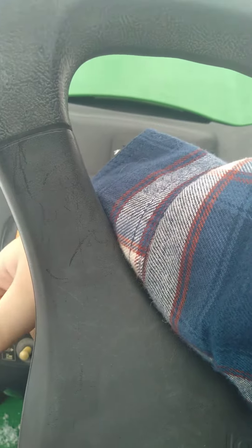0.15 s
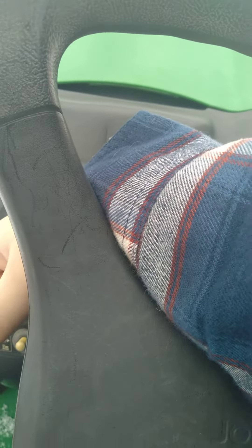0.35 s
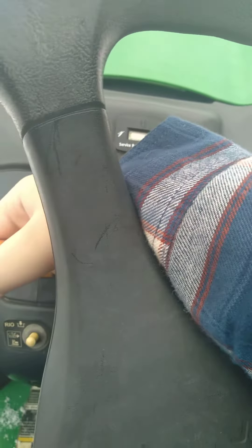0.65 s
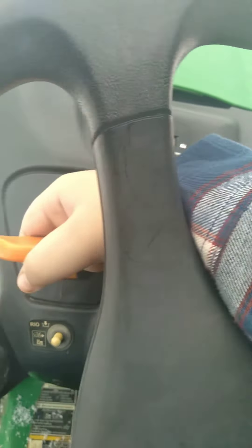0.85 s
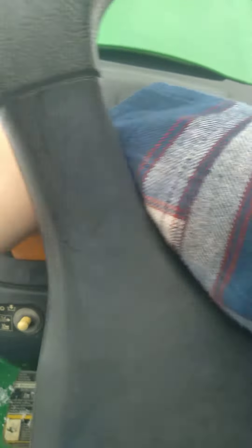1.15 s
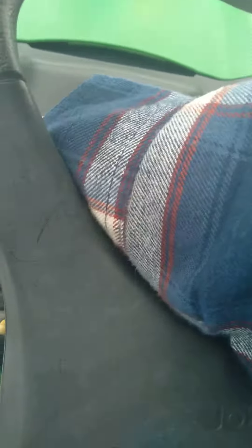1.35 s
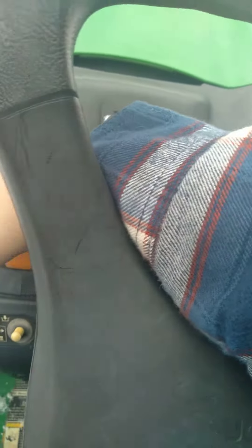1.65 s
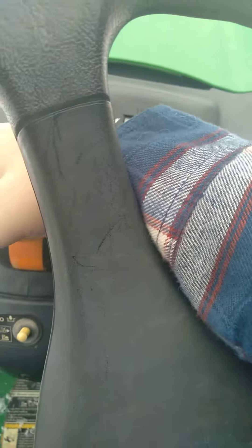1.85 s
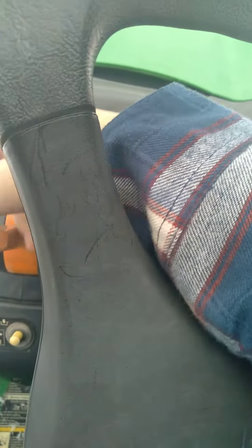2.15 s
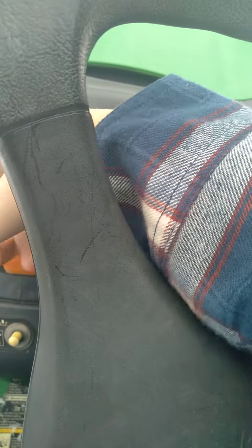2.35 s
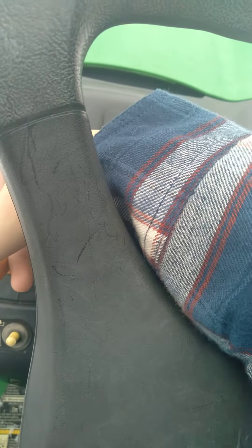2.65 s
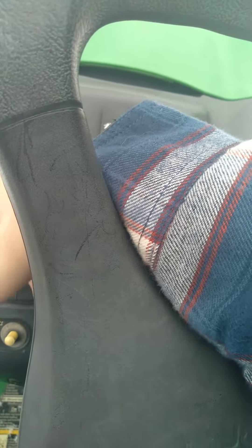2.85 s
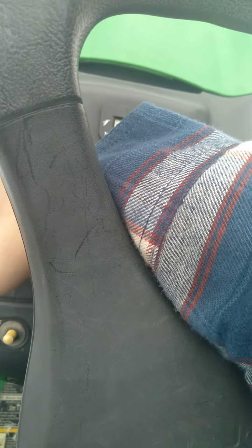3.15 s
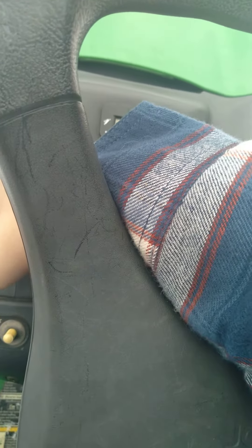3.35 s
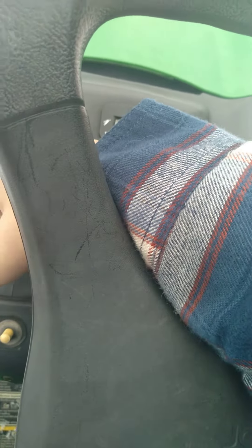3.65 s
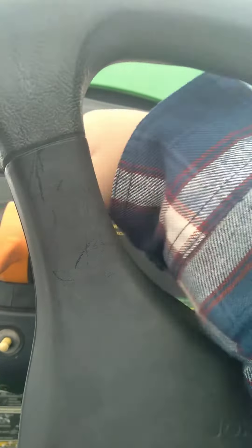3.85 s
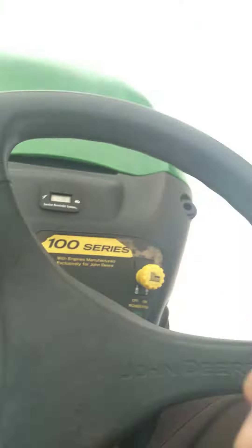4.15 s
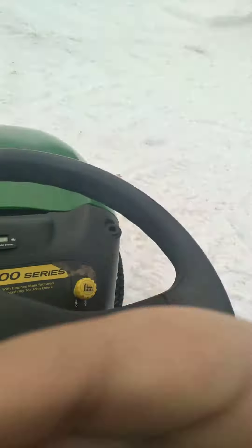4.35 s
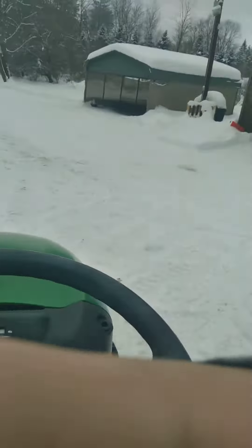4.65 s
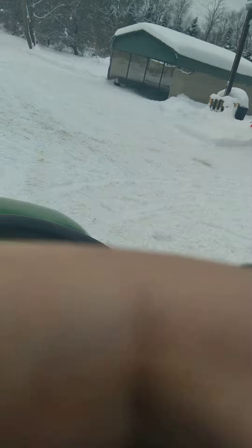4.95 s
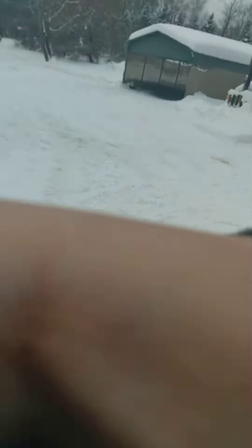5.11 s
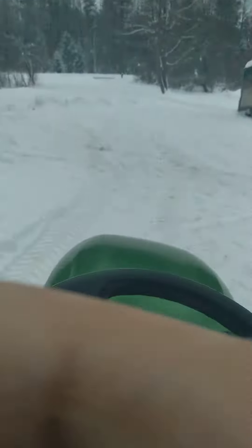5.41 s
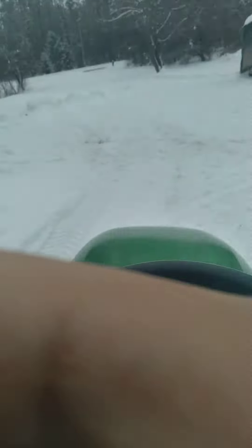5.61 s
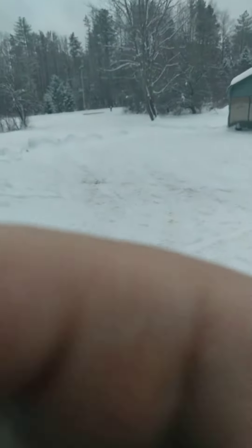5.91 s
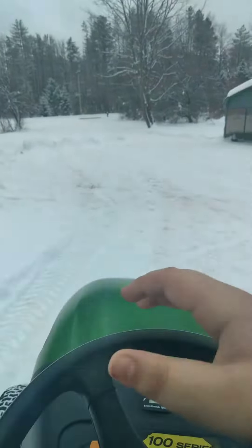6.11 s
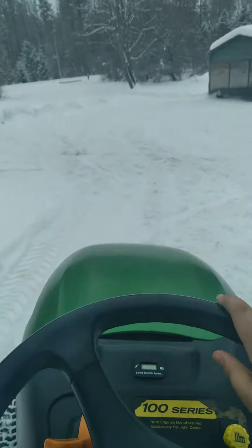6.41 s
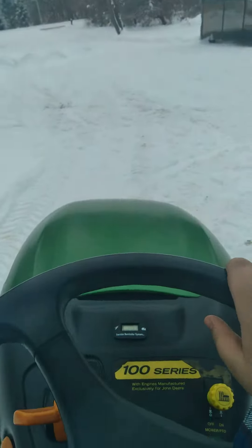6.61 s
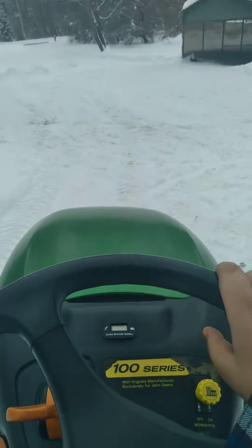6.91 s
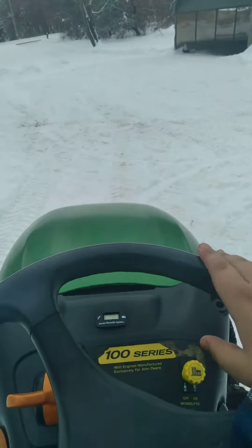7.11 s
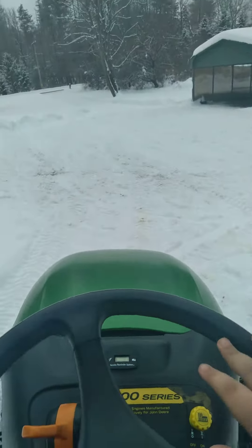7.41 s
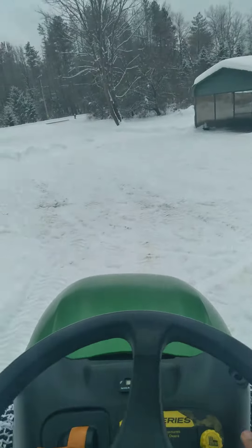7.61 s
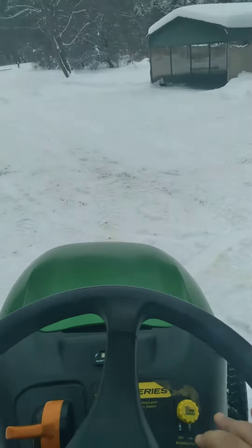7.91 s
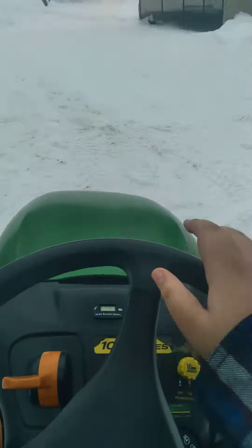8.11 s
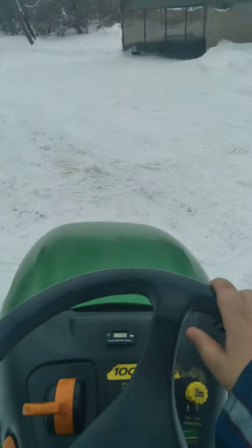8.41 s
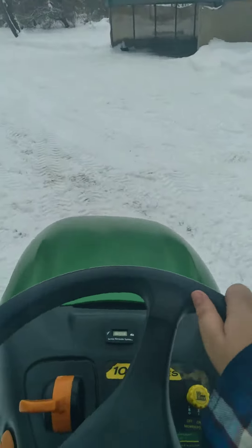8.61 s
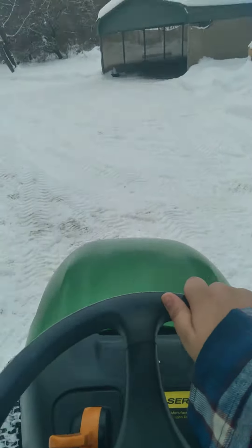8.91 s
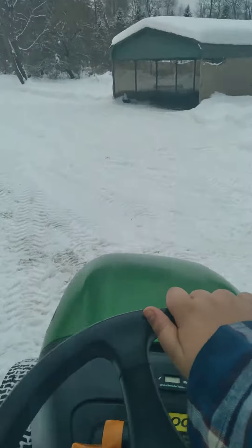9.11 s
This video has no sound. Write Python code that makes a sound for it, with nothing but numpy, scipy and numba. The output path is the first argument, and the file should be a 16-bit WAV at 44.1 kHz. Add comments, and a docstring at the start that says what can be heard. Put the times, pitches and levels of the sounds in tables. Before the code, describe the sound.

Heard from the seat, a lumpy garden tractor engine blips twice, drones on with clatter and hiss, then sags, shudders and recovers.

```python
"""A lawn tractor's V-twin heard from the seat: a ragged idle, two revs, then the drive takes up its load. Two
unevenly spaced exhaust pulses a cycle excite resonances of pipe and muffler as boom and bark. The same firings
shake the hood, knock it into a growl, and pulse the noise of clatter, hiss and sizzle; valve gear clacks after
each. Weak firings leave gulps, overruns burble, and fan roar and low rumble lie beneath."""
import sys
import numpy as np
from scipy import signal
from scipy.fft import rfft, irfft, next_fast_len
from scipy.io import wavfile
from scipy.ndimage import uniform_filter1d
from numba import njit

SR = 44100
rng = np.random.default_rng(int(sys.argv[2]) if len(sys.argv) > 2 else 0)


def generate_wav(signal):
    """Clip the signal to [-1, 1] and save it as 16-bit WAV at the path in sys.argv[1]."""
    frames = np.transpose(np.atleast_2d(signal))
    scaled = np.clip(frames, -1, 1) * 32767
    pcm = np.round(scaled).astype(np.int16)
    wavfile.write(sys.argv[1], SR, pcm)


N = 408366
TIME = np.arange(N) / SR

IDLE_RPM, CRUISE_RPM, CRUISE_EFFORT_DB = 1950, 2400, -20
SECOND_CYLINDER = 270 / 720   # crank angle of the second firing, as a share of the four-stroke cycle

# overruns, as a rev dies: (start [s], length [s], burble level [dB])
OVERRUNS = [(-.05, 0.244, -29.5), (1.374, 0.484, -26.5)]
# colour of the clatter and of the valve gear: (frequency [Hz], relative gain [dB])
CLATTER_COLOUR = [(900, -14), (1300, 0.5), (1550, 3), (1950, -0.5), (2350, 4.5), (3000, -1), (3700, -2),
                  (4400, -12), (6000, -57)]


def from_db(db):
    """Amplitude ratio of a level: 20 dB per factor of ten."""
    return 10 ** (np.asarray(db) / 20)


def in_time(rows):
    """Linear interpolation of each column of a time curve at every sample."""
    s, *columns = np.transpose(rows)
    return [np.interp(TIME, s, c) for c in columns]


def ramp(start_s, length_s):
    """Linear envelope from 0 to 1."""
    return np.clip((TIME - start_s) / length_s, 0, 1)


def swell(start_s, length_s, edge_s):
    """Trapezoidal envelope: rise, hold and fall between 0 and 1."""
    return ramp(start_s, edge_s) - ramp(start_s + length_s, edge_s)


def wandering(count):
    """Slow random modulation: straight lines through normal points of spread 1."""
    return np.interp(TIME, np.linspace(0, TIME[-1], count), rng.standard_normal(count))


def gain_at(points):
    """Spectral envelope, linear in dB over log frequency, as a gain for every FFT bin."""
    hz, db = np.transpose(points)
    bins = np.fft.rfftfreq(next_fast_len(N), 1 / SR) + 1
    return from_db(np.interp(np.log(bins), np.log(hz), db))


def coloured(x, gain):
    """Linear filtering by multiplication in the frequency domain."""
    size = next_fast_len(N)
    return irfft(rfft(x, size) * gain, size)[..., :N]


def cut(x, hz, kind, order):
    """Butterworth high- or low-pass, maximally flat in its pass band."""
    return signal.sosfilt(signal.butter(order, hz, kind, fs=SR, output="sos"), x + 1e-18)


def evened(x):
    """Level normalisation: the running power of the centre of the image is held near 1."""
    power = np.atleast_2d(x).mean(axis=0) ** 2
    for size in (SR // 5, SR // 8):
        power = uniform_filter1d(power, size)
    return x / np.sqrt(np.abs(power) + 1e-20)


def panned(x, db):
    """Interaural level difference, left minus right in dB, with the mean gain kept."""
    gains = from_db(np.array([db, -db]) / 2)
    return x * gains / gains.mean(axis=0)


@njit
def resonance(x, hz, width):
    """Damped oscillator: a two-pole resonance with a moving centre and a peak gain near 1."""
    r, y = np.exp(-np.pi * width / SR), np.zeros(len(x))
    for i in range(2, len(x)):
        drive = (1 - r * r) / 2 * (x[i] - x[i - 2])
        y[i] = drive + 2 * r * np.cos(2 * np.pi * hz[i] / SR) * y[i - 1] - r * r * y[i - 2]
    return y


def narrow(x, hz, width_hz):
    """Cascaded resonance: two passes of a fixed mode steepen its sides."""
    for _ in range(2):
        x = resonance(x, np.full(N, float(hz)), float(width_hz))
    return x


def duct(x, modes, stretch, sign, tilt_db):
    """Modal superposition: neighbours in like or opposite sign, tilted in dB per octave."""
    centre = np.mean([hz for hz, width, db in modes])
    total = 0
    for k, (hz, width, db) in enumerate(modes):
        gain = from_db(db + tilt_db * np.log2(hz / centre))
        total = total + sign ** k * gain * resonance(x, hz * stretch, float(width))
    return total


def clicks(at, sizes):
    """Impulse train: one impulse at each given sample."""
    return np.bincount(at, sizes, N)


def at_phase(phase, at, delay):
    """Crank timing: the samples a share of a cycle after the given ones."""
    return np.minimum(np.searchsorted(phase, phase[at] + delay), N - 1)


def gritty(flow, grit_db):
    """Amplitude-modulated stereo noise: the flow and millisecond grains set its strength."""
    step = SR // 1000
    grains = np.interp(np.arange(N) / step, np.arange(N // step + 2), rng.standard_normal(N // step + 2))
    return flow * from_db(grit_db * grains) * rng.standard_normal((2, N))


def diffuse_noise():
    """Partly correlated noise: a common part with a weaker independent part at each ear."""
    return rng.standard_normal(N) + 0.28 * rng.standard_normal((2, N))


def rumble(level_db=-46):
    """Broadband noise shaped by a low spectral envelope lies under everything."""
    # colour: (frequency [Hz], relative gain [dB])
    rumble_colour = [(18, -16), (30, 9), (45, 7), (70, -20), (120, -42), (280, 15), (600, -44)]
    low = cut(coloured(diffuse_noise(), gain_at(rumble_colour)), 1060, "low", order=2)
    return from_db(level_db) * evened(low)


def fan_roar(effort_db, base_db=-34, load_share=0.021):
    """Turbulence noise: the cooling fan roars in a low band and swells very slightly with effort."""
    air = cut(cut(diffuse_noise(), 286, "high", order=2), 357, "low", order=3)
    return from_db(base_db + load_share * (effort_db - CRUISE_EFFORT_DB)) * evened(air)


def ticks(ring_s=0.0084, level_db=-8):
    """Impulsive noise: short sharp ticks and snaps, with afterfire pops during the run of weak firings."""
    # (time [s], level before the common level_db [dB], low edge [Hz])
    bursts = [(.8885, -4, 5000), (.9475, -12, 5000), (1.073, 6, 4500), (2.8062, -3, 900), (3.0282, -7, 900),
              (3.2172, -3, 800), (3.8811, -9.5, 4000), (5.614, 1, 5000), (6.227, -2, 4000),
              (7.2354, -18, 900), (7.346, -8, 1300), (7.4094, -4, 3010), (7.4494, -4, 700),
              (7.6061, -3, 1300), (7.657, -4, 1300), (8.106, -11, 3000), (8.586, -8, 1200),
              (8.8511, -19, 1200), (9.1873, -12, 1200)]
    t = TIME[:SR // 20]
    out = np.zeros((2, N + len(t)))
    for s, db, low_hz in bursts:
        # each decays 60 dB in ring_s
        burst = from_db(db + level_db - 60 * t / ring_s) * rng.standard_normal((2, len(t)))
        start = int(s * SR)
        out[:, start:start + len(t)] += cut(burst, low_hz, "high", order=2)
    return cut(out[:, :N], 10000, "low", order=2)


def nearby_echoes(x, strength, wander=0.0678):
    """Comb filtering: dash, wheel and hands reflect the sound over short paths that shift."""
    out = x.copy()
    for ear in range(2):
        for path_s in rng.uniform(.0005, .004, 3):
            sway = wandering(count=16)
            out[ear] += strength * np.interp(TIME - path_s * (1 + wander * sway), TIME, x[ear])
    return out


def eddies(x, strength=0.51, path_s=0.000349, spread_s=.00009):
    """Comb filtering by a very short, restless second path: eddies colour each puff differently."""
    out = x.copy()
    for ear in range(2):
        delay_s = path_s + spread_s * wandering(count=800)
        out[ear] += strength * np.interp(TIME - delay_s, TIME, x[ear])
    return out


def band_swells(x, edge_s=0.14):
    """Time-varying band gain: bands of the bay noise swell or fade for a while, some gliding in pitch."""
    # (start [s], length to the start of the return [s], first centre [Hz], last centre [Hz],
    #  width [Hz], band gain [dB])
    passing_gains = [(0.19, 2.7, 3040, 3500, 690, -5.5), (1.52, 0.61, 2000, 4200, 3600, 4),
                     (2.75, 1.22, 2500, 2300, 700, 3), (3.96, 0.43, 7300, 8100, 700, 6.5),
                     (5.4, 0.86, 1000, 1150, 230, -5.5), (4.6, 1.6, 2160, 2230, 690, -4),
                     (4.42, 1.88, 8200, 7100, 510, 5), (4.9, 1.82, 10000, 9600, 530, 6),
                     (5.48, 1.28, 5000, 4800, 950, -4.5), (6.5, 0.5, 910, 1160, 150, 6.5),
                     (6.28, 1.8, 3100, 3370, 950, 4.5), (6.97, 1.1, 6900, 6100, 900, 3),
                     (7.56, 1.62, 4900, 4300, 1200, -8), (8.25, 1.1, 1170, 1280, 160, -12),
                     (7.9, 0.96, 1760, 1530, 210, 3.5), (7.91, .7, 10100, 10800, 1020, 6.5),
                     (5.1, 1.55, 1900, 3300, 1500, -2), (8.55, .8, 7500, 11000, 12000, -4.5)]
    for s, length_s, from_hz, to_hz, width_hz, db in passing_gains:
        hz = from_hz + (to_hz - from_hz) * ramp(s, length_s + edge_s)
        band = np.array([resonance(ear, hz, float(width_hz)) for ear in x])
        x = x + (from_db(db * swell(s, length_s, edge_s)) - 1) * band
    return x


def jet(flow, colour, level_db, pan_db, grit_db):
    """Flow-modulated noise: pulsing noise from the engine bay with its near reflections."""
    noise = nearby_echoes(coloured(gritty(flow, grit_db), colour), strength=.5)
    return from_db(level_db) * evened(panned(noise, pan_db))


def whistle(flow, width_hz=210):
    """Resonant filtering of flow noise: a narrow whistling band wanders within the sizzle."""
    # (time [s], band centre before the random wander [Hz])
    whistle_centres = [(0, 10500), (.6, 10500), (1.1, 9300), (3, 9350), (5.5, 10050), (6.3, 9660),
                       (7.5, 9950), (8.6, 9540), (9.26, 10400)]
    wander_hz = 148
    hz = in_time(whistle_centres)[0] + wander_hz * wandering(count=40)
    ears = []
    for ear in gritty(flow, grit_db=-3.0):
        band = resonance(ear, hz, float(width_hz))
        ears.append(resonance(band, hz, 4.6 * width_hz))
    return np.array(ears)


def valve_clacks(phase, at, ring_s=0.02, scatter_db=4.5):
    """Impact excitation: valve gear clacks after every firing and rings the crowded modes of the block."""
    delay_cycles = .078
    t = TIME[:SR // 20]
    ringing = rng.standard_normal((2, len(t))) * from_db(-60 * t / ring_s)
    sizes = from_db(scatter_db * rng.standard_normal(len(at)))
    blows = clicks(at_phase(phase, at, delay_cycles), sizes)
    clacks = signal.fftconvolve(blows[None], ringing, axes=1)[:, :N]
    return coloured(clacks, gain_at(CLATTER_COLOUR))


def hood(at, strength_db, flow, ring_s=0.15, lag_s=.004, buzz_db=3.0, panel_db=-7):
    """Forced panel vibration: firings ring crowded modes, differing by ear, and a strong one; edges buzz."""
    # colour: (frequency [Hz], relative gain [dB])
    hood_colour = [(400, -10.5), (540, 4.5), (650, -0.5), (730, -1.5), (810, -4.5), (930, -4.5),
                   (1050, -5.5), (1200, -10), (1500, -9.5), (2000, -22), (2400, -17), (3000, -52)]
    panel_hz, panel_width_hz = 813, 71   # the strongest mode; width of each of its two passes
    t = TIME[:SR // 10]
    panels = rng.standard_normal((2, len(t))) * from_db(-60 * t / ring_s)
    shake = np.interp(TIME - lag_s, TIME, clicks(at, from_db(strength_db / 2)))
    ringing = evened(signal.fftconvolve(shake[None], panels, axes=1)[:, :N])
    buzz = from_db(buzz_db) * evened(gritty(flow, grit_db=4.0))
    crowd = evened(coloured(ringing + buzz, gain_at(hood_colour)))
    return crowd + from_db(panel_db) * evened(narrow(shake, panel_hz, panel_width_hz))


def engine_bay(phase, at, strength_db, flow, knocks, rpm, effort_db, throttle_db, seated, clatter_pan_db,
               hiss_pan_db):
    """Source summation: hood, clatter, clacks, hiss, sizzle and whistle follow effort, speed and throttle."""
    # colours: (frequency [Hz], relative gain [dB])
    hiss_colour = [(3000, -2), (4400, -2), (5200, 2), (6500, 3.5), (7600, 6), (8600, -5), (10000, -38),
                   (12000, -39)]
    sizzle_colour = [(6500, -37), (8200, -4), (9300, -1), (10100, -2.5), (11200, -6), (13000, -11.5),
                     (14500, -10), (16000, -20.5)]
    # colour of the hiss between the ears: (frequency [Hz], left minus right [dB])
    hiss_sides = [(4000, 2), (6000, 4), (7500, 7), (9000, -1), (10300, -10), (12000, -2), (16000, 3.5)]
    extra_rpm = rpm - CRUISE_RPM
    # having sat back, a hand shields the listening point, then is slowly taken off
    covered = seated - ramp(6.83, 3.4)
    # the drive takes up the load and shakes the hood until the speed has sagged
    drive_s, rise_s, hold_s, fall_s = 6.56, 0.37, 0.079, 0.26
    straining = ramp(drive_s, rise_s) - ramp(drive_s + rise_s + hold_s, fall_s)

    # 0.33 dB per dB of effort; 0.041 dB per rpm, only this far from cruising speed
    hood_db = -30 + 0.33 * (effort_db - CRUISE_EFFORT_DB) + 0.041 * np.clip(extra_rpm, -200, 180)
    hood_db = hood_db - 4 * seated - 7 * covered + 13.5 * straining
    # the left ear is the more open one: clatter and hiss gain level as they pan to it
    waver_db = 2.5
    clatter_db = -42 + 0.4 * throttle_db + 0.014 * extra_rpm + 0.43 * clatter_pan_db
    clatter_db = clatter_db - 3.5 * covered + waver_db * wandering(count=70)
    hiss_db = -43 + 0.86 * throttle_db + hiss_pan_db - hiss_pan_db.mean()
    hiss_db = hiss_db + waver_db * wandering(count=70)
    sizzle_db = -41 + throttle_db

    rattle = from_db(hood_db) * evened(hood(at, strength_db, knocks) * from_db([[1.5], [-1.5]]))
    clatter = jet(knocks, gain_at(CLATTER_COLOUR), clatter_db, clatter_pan_db, grit_db=1.2)
    clacks = from_db(clatter_db - 7.5) * evened(panned(valve_clacks(phase, at), clatter_pan_db))
    sides = np.sqrt(gain_at(hiss_sides))
    ears = np.array([sides, 1 / sides]) / np.hypot(sides, 1 / sides)
    hiss = jet(flow, gain_at(hiss_colour) * ears, hiss_db, hiss_pan_db, grit_db=1.7)
    sizzle = jet(flow, gain_at(sizzle_colour) * ears, sizzle_db, hiss_pan_db, grit_db=1.2)
    whistling = from_db(sizzle_db - 11.0) * evened(panned(whistle(flow), hiss_pan_db - 7))
    breath = from_db(-0.72) * eddies(hiss + sizzle)
    return cut(band_swells(rattle + clatter + clacks + breath + whistling), 155, "high", order=2)


def throttle():
    """Valve opening as a control level: the rise of the intake hiss above a shut throttle, in dB."""
    # (start [s], opening time [s], held [s], closing time [s], rise [dB]); the largest rise counts
    openings = [(0.854, 0.11, 0.11, 0.82, 19), (1.8, 0.1, 0.15, 2.73, 15.5), (3.8, 0.2, 0, 2.1, 8),
                (4.9, 1.24, 0.067, 5.6, 12), (6.8, 0.35, 0.41, 1.24, 19)]
    rises = []
    for s, opening_s, held_s, closing_s, db in openings:
        rises.append(db * (ramp(s, opening_s) - ramp(s + opening_s + held_s, closing_s)))
    return np.max(rises, axis=0)


def roughness(rpm, edge_s=0.047):
    """Cyclic variability: firing scatter (dB) grows at idle; it and turbulence (dB) grow on the overrun."""
    slow = np.clip((CRUISE_RPM - rpm) / (CRUISE_RPM - IDLE_RPM), 0, 1)
    overrun = sum(swell(s, length_s, edge_s) for s, length_s, db in OVERRUNS)
    scatter_db = 0.6 + 4 * slow + 3 * overrun
    turbulence_db = -14 + 8.5 * overrun
    return scatter_db, turbulence_db


def firings(phase, scatter_db, second_db):
    """Uneven pulse timing: sample and strength (dB) of each exhaust opening, and gulps of weak ones."""
    # runs of weak firings, one cylinder failing every other cycle:
    # (time [s], count, change of strength [dB], relative gulp level [dB])
    misfires = [(.125, 6, -7, -30), (1.43, 1, -2, -20), (1.495, 4, -5, -21.5), (2.62, 1, -8, -36),
                (2.71, 7, -5.5, -22), (3.36, 2, -7, -29), (3.655, 2, -6, -24), (4.68, 1, -12, -34),
                (6.77, 2, -6, -33), (7.71, 1, -10, -40), (8.87, 1, -7, -38), (9.11, 1, -11, -21)]
    turns = (np.arange(int(phase[-1]) + 1)[:, None] + [0, SECOND_CYLINDER]).ravel()
    turns = turns[(turns > phase[0]) & (turns < phase[-1])]
    at = np.searchsorted(phase, turns)
    strength_db = scatter_db[at] * rng.standard_normal(len(at)) + second_db * (turns % 1 > 0)
    gulps = np.zeros(N)
    for s, count, loss_db, gulp_db in misfires:
        weak = np.abs(TIME[at] - s).argmin() + 4 * np.arange(count)   # four openings make two cycles
        strength_db[weak] += loss_db
        gulps[at[weak]] = from_db(gulp_db)
    return at, strength_db, gulps


def gas_flow(phase, at, strength_db, scatter_db, steady_db, choke_share, second_db=1.5):
    """Pulsating flow: puffs add in power to the fan's steady draught; the returning pipe wave chokes it."""
    # gas flow after an exhaust valve opens: (delay [cycles], width [cycles], relative level [dB])
    puffs = [(.103, .024, 1), (.18, .011, -1.5), (.285, .065, -4.5)]
    # choking by the returning wave: (delay [cycles], width [cycles], depth before choke_share [dB])
    chokes = [(.052, .022, -5), (.15, .013, -10), (.208, .013, -9)]
    grid = np.arange(0, phase[-1] + 1, 1 / 512)   # cycles

    def bells(delay, width, sizes):
        """Convolution of the firing train with one bell-shaped swell."""
        starts = np.bincount(np.searchsorted(grid, phase[at] + delay), sizes, len(grid))
        bell = np.exp(-(np.arange(-128, 129) / 512 / width) ** 2)
        return np.interp(phase, grid, np.convolve(starts, bell, "same"))

    second = phase[at] % 1 > SECOND_CYLINDER / 2
    puff_db = strength_db / 2 + second_db * second
    power = from_db(steady_db) ** 2
    for delay, width, db in puffs:
        sizes_db = db + puff_db + scatter_db * rng.standard_normal(len(at))
        power = power + bells(delay, width, from_db(sizes_db) ** 2)
    choke_db = sum(bells(delay, width, db * np.minimum(from_db(strength_db), 1))
                   for delay, width, db in chokes)
    return np.sqrt(power) * from_db(choke_share * choke_db)


def intake_honk(pulses, throttle_db):
    """Cavity resonance: the air box honks along with the strokes, louder with the throttle open."""
    # (frequency [Hz], width of each of two passes [Hz], relative level [dB])
    airbox_modes = [(278, 31, 4), (542, 70, 1)]
    box = sum(from_db(db) * narrow(pulses, hz, width) for hz, width, db in airbox_modes)
    return from_db(-52 + .95 * throttle_db) * evened(box)


def burble(flow, edge_s=0.019):
    """Noise-excited shell modes: on the overrun, late-burning gas churns in the muffler."""
    # (frequency [Hz], width of each of two passes [Hz], relative level [dB])
    shell_modes = [(340, 67, 7), (522, 79, -3), (615, 120, 2.5), (827, 370, -15.5)]
    level = sum(from_db(db) * swell(s, length_s, edge_s) for s, length_s, db in OVERRUNS)
    churn = flow * rng.standard_normal(N)
    return level * evened(sum(from_db(db) * narrow(churn, hz, width) for hz, width, db in shell_modes))


def growl(phase, at, strength_db, flow, rpm, rasp_db=-3, second_db=7.5, lead_s=0.002995, speed_power=0.31):
    """Structural resonance: firings knock on the hood, whose modes rise with the speed."""
    # hood modes at cruising speed: (frequency [Hz], width [Hz], relative level [dB])
    hood_modes = [(763, 105, -1), (816, 83, 1.5), (872, 140, -5.5)]
    # (time [s], level [dB])
    growl_levels = [(0, -68), (.8, -43), (1.1, -28), (1.5, -49), (2.3, -28), (3, -42), (4, -51), (4.6, -60),
                    (7.6, -53), (8.1, -35.5), (9.26, -35.5)]
    second = phase[at] % 1 > SECOND_CYLINDER / 2
    knock = np.interp(TIME + lead_s, TIME, clicks(at, from_db(strength_db / 2 + second_db * second)))
    rasp = from_db(rasp_db) * evened(flow * rng.standard_normal(N))
    hood_ring = duct(evened(knock) + rasp, hood_modes, (rpm / CRUISE_RPM) ** speed_power, -1.13, 0)
    hood_ring = cut(cut(hood_ring, 580, "high", order=3), 1080, "low", order=2)
    return from_db(in_time(growl_levels)[0]) * evened(hood_ring)


def panel_drone(pulses):
    """Selective resonance: two panels pick out their own pitches from the exhaust pulses."""
    # (time [s], upper panel level [dB], lower panel level [dB])
    drone_levels = [(0, -37, -43), (.6, -56, -41), (1.3, -37, -62), (4.1, -32.5, -53), (5.5, -40.5, -56),
                    (6.6, -48.5, -40), (8, -64, -37), (9.26, -55, -33.5)]
    upper, lower = from_db(in_time(drone_levels))
    return upper * evened(narrow(pulses, 629, 47)) + lower * evened(narrow(pulses, 325.4, 22))


def exhaust(phase, at, strength_db, gulps, flow, rpm, effort_db, throttle_db, turbulence_db):
    """Blowdown pulses ring pipe and chambers; pumping keeps some boom even when a firing fails."""
    # long modes of pipe and muffler at cruising speed: (frequency [Hz], width [Hz], relative level [dB])
    pipe_modes = [(101.3, 32.8, 1), (192.2, 39.1, 4.5), (213.6, 36.6, 0)]
    # muffler chambers at the heat of cruising speed: (frequency [Hz], width [Hz], relative level [dB])
    chamber_modes = [(312.3, 16.3, -9), (371.6, 36.3, -1), (437.6, 75.2, 3.5), (464.1, 52.2, 3.5)]
    swirl = from_db(turbulence_db) * evened(flow * rng.standard_normal(N))

    # the boom holds nearly steady until the effort passes the knee
    boom_knee_db, boom_slope, boom_share = -18.5, 1.36, 0.52
    boom_db = -21.5 + boom_slope * np.logaddexp(0, effort_db - boom_knee_db)
    push = np.interp(TIME + .001, TIME, clicks(at, from_db(boom_share * strength_db)))
    push = evened(push) + .7 * swirl
    # away from cruising speed the firings feed the lowest mode less
    pipe_tilt_db = 3 * np.abs(rpm - CRUISE_RPM) / (CRUISE_RPM - IDLE_RPM)
    boom = duct(push, pipe_modes, (rpm / CRUISE_RPM) ** 0.12, -1.057, pipe_tilt_db)
    boom = cut(cut(boom, 82.0, "high", order=3), 246, "low", order=3)

    # each intake stroke sends a weaker, inverted pulse
    suction_delay_cycles, suction_db = .328, -17
    suction = clicks(at_phase(phase, at, suction_delay_cycles), np.full(len(at), from_db(suction_db)))
    # the crack of the opening valve comes before the bulk of the gas
    bark_lead_s = 0.00635
    front = np.roll(clicks(at, from_db(strength_db)) - suction, -int(bark_lead_s * SR))
    crack = evened(front) + swirl

    # muffler heat as an equivalent speed: it cools slowly, never below a floor that effort raises
    cooling_rpm_per_s, warm_rpm, heat_rpm_per_db, heat_knee_db = 182, 2353, 70, -19.5
    cooling = cooling_rpm_per_s * TIME
    hot_rpm = np.maximum.accumulate(rpm + cooling) - cooling
    hot_rpm = np.maximum(hot_rpm, warm_rpm + heat_rpm_per_db * np.maximum(effort_db - heat_knee_db, 0))
    # in hotter gas the chamber modes rise and the upper ones take over
    heat_tilt_db = 11 * np.clip((hot_rpm - 2350) / 300, 0, 1.5)
    bark = duct(crack, chamber_modes, (hot_rpm / CRUISE_RPM) ** 0.56, -1.043, heat_tilt_db)
    bark = cut(cut(bark, 155, "high", order=2), 680, "low", order=3)

    # an unburnt charge sucks gas back up the pipe
    gulp_hz, gulp_width_hz = 62.0, 34.0
    gulp = resonance(gulps, np.full(N, gulp_hz), gulp_width_hz) * SR / (np.pi * gulp_width_hz)
    gulp = from_db(12.0) * cut(cut(gulp, 160, "low", order=2), 104, "high", order=3)
    low = from_db(boom_db) * evened(boom) - gulp
    high = from_db(effort_db) * evened(bark) + panel_drone(crack) + intake_honk(crack, throttle_db)
    return low, high


def scene():
    """Common excitation: the crank times the engine; effort and throttle set levels, the listener's pose sides."""
    # crankshaft: (time [s], speed [rpm])
    crank_speed = [(0.0, 2129), (0.39, 1964), (0.81, 1922), (1.08, 2430), (1.32, 2616), (1.5, 2442),
                   (1.83, 2247), (2.07, 2675), (2.36, 2824), (3.04, 2559), (3.55, 2441), (3.86, 2445),
                   (4.91, 2357), (5.05, 2369), (5.83, 2321), (6.5, 2411), (6.74, 2325), (7.09, 2033),
                   (7.46, 2302), (8.31, 2503), (8.61, 2549), (9.26, 2470)]
    # effort of the engine, as the level of its bark: (time [s], level [dB])
    engine_effort = [(0, -35), (.8, -31.5), (.96, -17), (1.31, -14.5), (1.42, -23), (1.8, -23),
                     (1.92, -16.5), (2.15, -12.5), (2.9, -15.5), (5.7, -25), (6.3, -21), (6.7, -18),
                     (7.0, -26.5), (7.43, -18.5), (7.7, -22.5), (8.22, -18.5), (8.43, -24.5), (9.26, -25.5)]
    # left minus right as the listener turns: (time [s], bark [dB], clatter [dB], hiss [dB])
    facing = [(0.0, 4, 2, -6), (3.9, 0, -6, -5), (4.5, -4.5, -10, -12), (4.9, -5, 7, -1),
              (6.0, -5.5, 16, -2.5), (7.1, -2.5, 10, -7.5), (8.6, -5, 13, -8), (9.26, -3, 12, -3)]
    rpm, = in_time(crank_speed)
    effort_db, = in_time(engine_effort)
    bark_pan_db, clatter_pan_db, hiss_pan_db = in_time(facing)
    throttle_db = throttle()
    seated = ramp(4.05, 0.43)   # the listener leans over the dash, then sits back, away from the hood

    phase = .25 + np.cumsum(rpm / 120) / SR   # cycles: two turns of the crank each
    scatter_db, turbulence_db = roughness(rpm)
    at, strength_db, gulps = firings(phase, scatter_db, second_db=0.6)
    flow = gas_flow(phase, at, strength_db, scatter_db=2.5, steady_db=-5.5, choke_share=2.7)
    knocks = gas_flow(phase, at, strength_db, scatter_db=2.5, steady_db=-7, choke_share=1.9)

    bay = engine_bay(phase, at, strength_db, flow, knocks, rpm, effort_db, throttle_db, seated,
                     clatter_pan_db, hiss_pan_db)
    boom, bark = exhaust(phase, at, strength_db, gulps, flow, rpm, effort_db, throttle_db, turbulence_db)
    muffler = bark + growl(phase, at, strength_db, flow, rpm) + burble(flow)
    left, right = boom * from_db([[-.6], [.6]]) + panned(muffler, bark_pan_db)
    # delay of the left ear: it lags while leaning and leads when seated
    lag_leaning_s, lag_seated_s = 0.00019, -0.00014
    left = np.interp(TIME - lag_leaning_s * (1 - seated) - lag_seated_s * seated, TIME, left)
    return np.array([left, right]) + bay + ticks() + fan_roar(effort_db) + rumble()


def record(dry):
    """Clipping and band limiting: peaks stop at full scale, then a steep low-pass cuts the top."""
    cutoff_hz = 16200
    low_pass = signal.ellip(12, .1, 80, cutoff_hz, fs=SR, output="sos")
    return signal.sosfilt(low_pass, np.clip(dry, -1, 1))


dry = scene()
out = record(dry)
generate_wav(out)
```